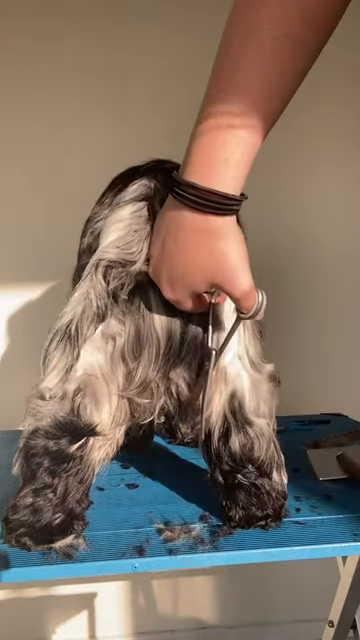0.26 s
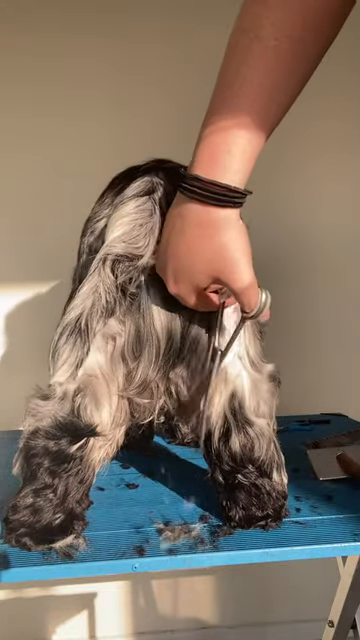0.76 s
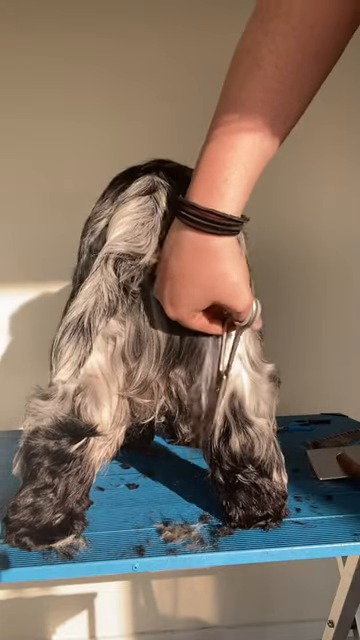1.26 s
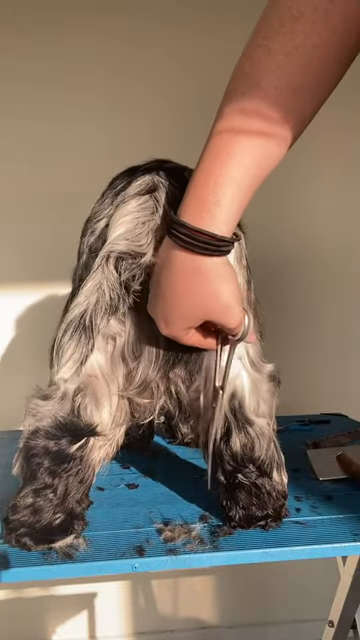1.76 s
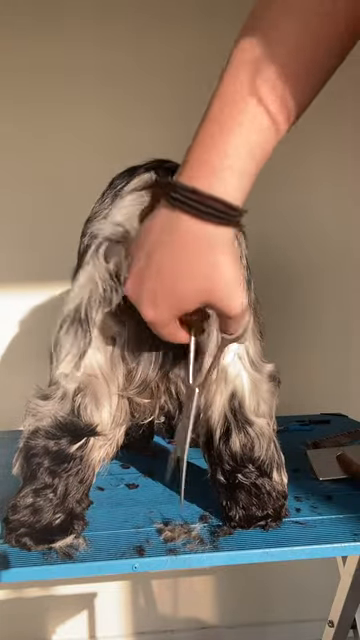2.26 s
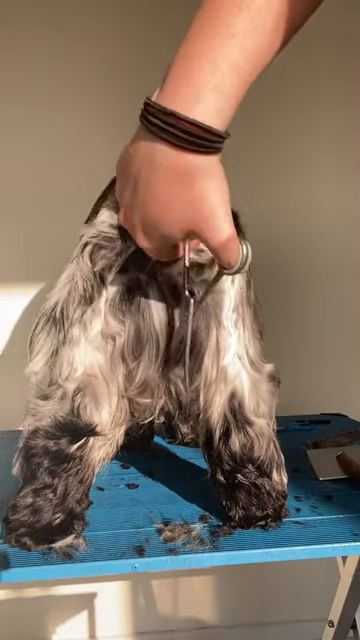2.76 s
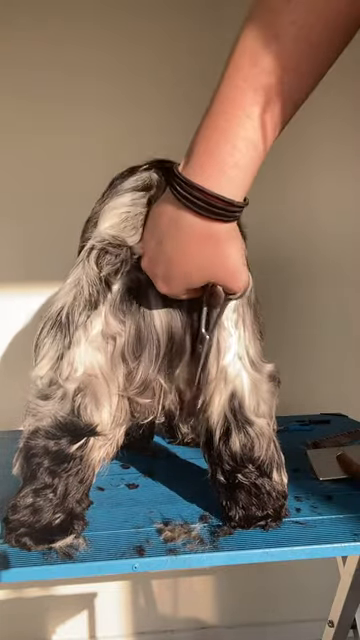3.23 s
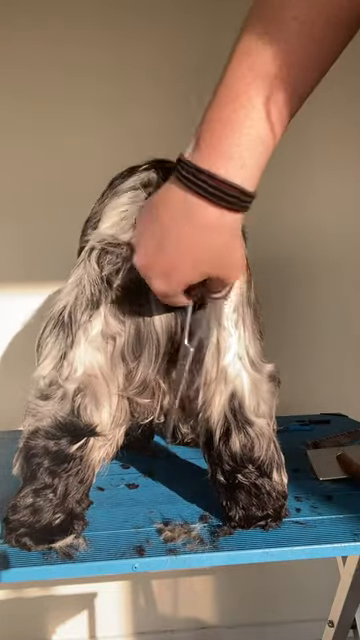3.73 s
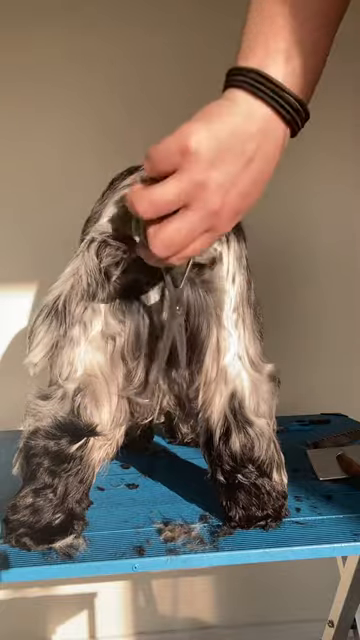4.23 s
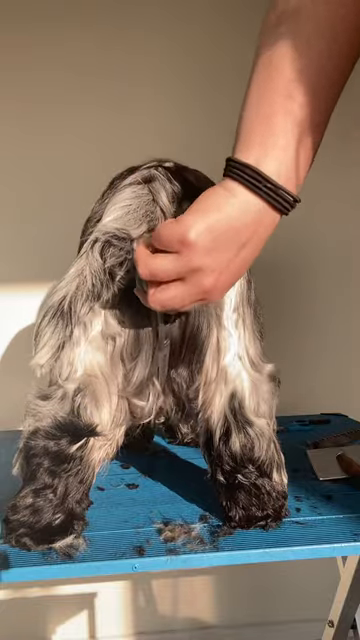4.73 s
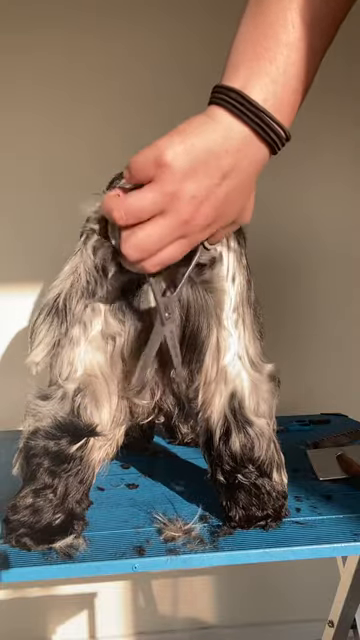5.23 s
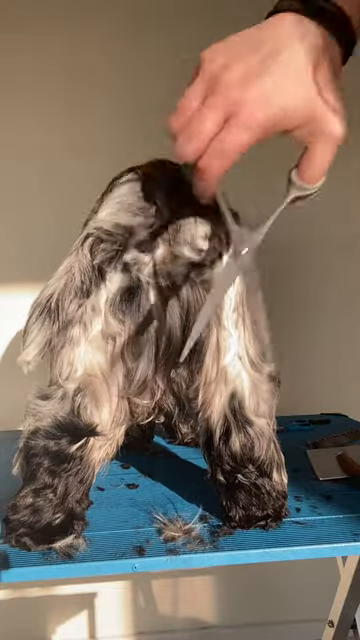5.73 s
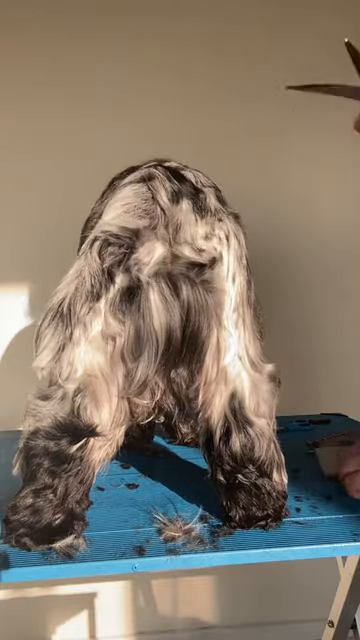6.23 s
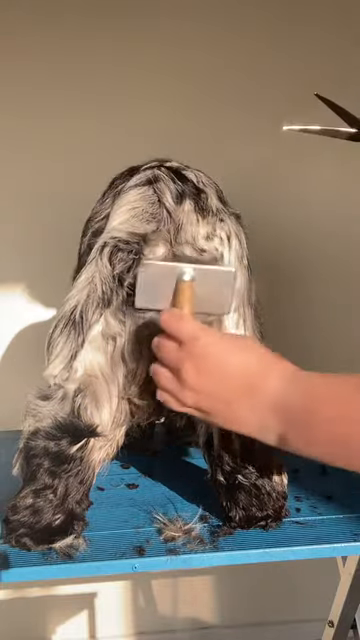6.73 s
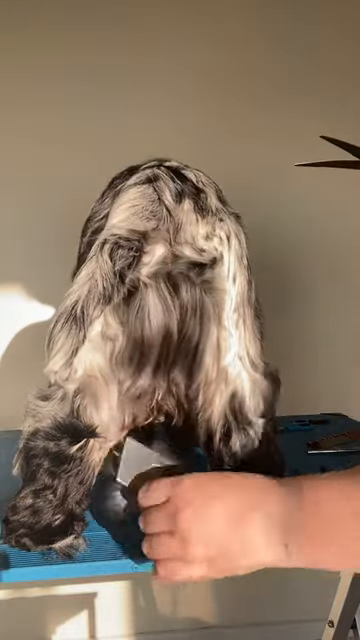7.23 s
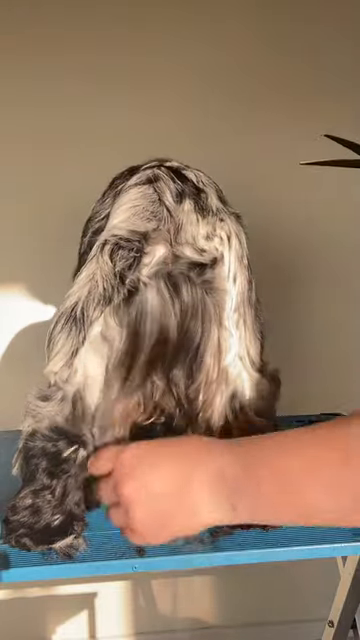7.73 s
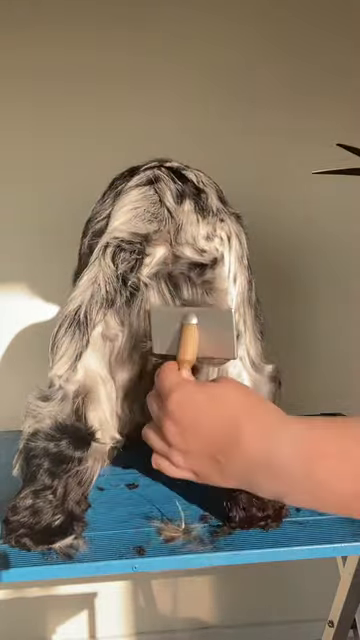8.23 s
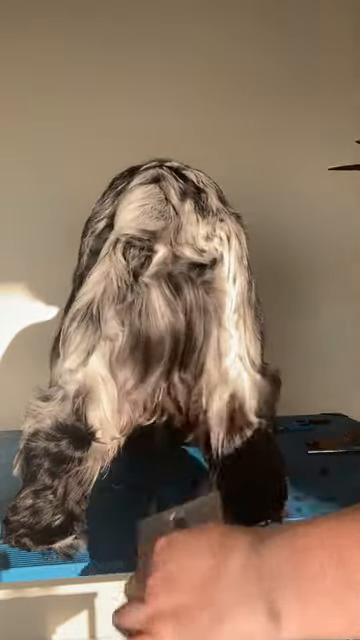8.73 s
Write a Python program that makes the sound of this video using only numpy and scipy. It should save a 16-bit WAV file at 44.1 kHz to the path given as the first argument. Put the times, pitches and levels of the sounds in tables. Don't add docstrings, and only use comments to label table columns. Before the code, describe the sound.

Grooming scissors snip thinly through dog hair in a quiet room, then a wire brush scrapes the coat and bangs hard on a table.

```python
import sys
import numpy as np
from scipy import signal
from scipy.fft import rfft, irfft
from scipy.io import wavfile

SR = 44100
rng = np.random.default_rng(int(sys.argv[2]) if len(sys.argv) > 2 else 0)


def boost(x):
    u = np.asarray(x, float) / 20
    return 10 ** u


def dump(signal):
    limited = np.clip(np.atleast_2d(signal).T, -1, 1)
    pcm = np.round(limited * 32767).astype(np.int16)
    wavfile.write(sys.argv[1], SR, pcm)


N = 396018

# start_s, peak_db, clatter_hz, crack_db, thump_db
FLAT_BLOWS = [
    (6.104, -37.5, 1300, -14, 6),
    (6.151, -18, 1180, -30.5, -1),
    (7.8098, -3, 1660, -11.5, -4.5),
    (8.667, -13.5, 2310, -7.5, -9),
]


def rms_one(x):
    return x / np.sqrt(np.mean(x ** 2) + 1e-20)


def in_time(tables, silent=-130):
    out = np.full((len(tables[0][0]) - 1, N), float(silent))
    for table in tables:
        s, *columns = np.transpose(table)
        s = np.r_[s[0] - .002, np.maximum.accumulate(s), s.max() + .015]
        i = np.arange(max(int(s[0] * SR), 0), min(int(s[-1] * SR), N))
        curves = [np.interp(i / SR, s, np.r_[silent, column, silent]) for column in columns]
        out[:, i] = np.maximum(out[:, i], curves)
    return out


def at_hz(points, hz):
    return np.interp(np.log(hz), np.log(np.array(points)[:, 0]), np.array(points)[:, 1])


def bin_hz(size):
    return np.maximum(np.arange(size // 2 + 1) * SR / size, 10)


def drift(rate):
    r = np.exp(-80 * np.pi * rate / SR)
    slow = signal.lfilter([1], [1, -2 * r, r * r], rng.standard_normal(N // 40 + 2002))[2000:]
    return np.interp(np.arange(N) / 40, np.arange(len(slow)), rms_one(slow))


def band(x, low_hz, high_hz):
    return signal.sosfilt(signal.butter(2, [low_hz, high_hz], "band", fs=SR, output="sos"), x)


def resonance(x, width_hz, hz):
    r = np.exp(-np.pi * width_hz / SR)
    zeros = np.array([1, 0, -1]) * (1 - r * r) / 2
    return signal.lfilter(zeros, [1, -2 * r * np.cos(2 * np.pi * hz / SR), r * r], x + 1e-18)


def ring(clicks, hz, t60):
    r, w = boost(-60 / (t60 * SR)), 2 * np.pi * hz / SR
    return signal.lfilter([0, np.sin(w)], [1, -2 * r * np.cos(w), r * r], clicks + 1e-18)


def grit(per_s, spread_db):
    sizes = boost(spread_db * np.minimum(rng.exponential(1, N), 4)) * rng.choice([-1, 1], N)
    return rms_one(sizes * (rng.random(N) < per_s / SR))


def stereo_noise(spectrum, likeness, size):
    hz = bin_hz(size)
    mid, side = rfft(rng.standard_normal((2, size)))
    alike = np.clip(at_hz(likeness, hz), -1, 1)
    pair = np.sqrt(1 + alike) * mid + np.sqrt(1 - alike) * side * [[1], [-1]]
    return hz, boost(at_hz(spectrum, hz)) * pair


def add(track, s, sound):
    i = round(s * SR)
    track[i:i + len(sound)] += sound[:N - i]


def swishes(rows, edge_db, width_share):
    out = np.zeros(N)
    for start_s, peak_s, end_s, db, hz in rows:
        t = start_s + np.arange(round((end_s - start_s) * SR)) / SR
        noise = rms_one(resonance(rng.standard_normal(SR), width_share * hz, hz))[:len(t)]
        level_db = np.interp(t, [start_s, peak_s, end_s], [db + edge_db, db, db + edge_db])
        add(out, start_s, boost(level_db) * noise)
    return out


def swells(rows, fade_s):
    return [(s - swell_s, s, s + fade_s, db, hz) for s, swell_s, db, hz in rows]


def hum():
    # freq_hz, density_db
    air_spectrum = [(15, -42), (28, -25.5), (59, 1), (112, -5.5), (142, 0), (172, -5.5), (243, -5),
                    (271, -13), (462, -10.5), (660, -15.5), (2600, -20), (3000, -26), (4150, -38),
                    (7680, -40.5), (12400, -52.5), (13000, -66.5)]
    # freq_hz, coherence
    air_likeness = [(60, 0.84), (130, 1), (290, -0.021), (640, -0.27), (1410, -0.19), (3100, -0.035),
                    (6820, 0.63), (15000, 0.0036)]
    # freq_hz, width_hz, level_db
    duct_modes = [(153, 64, -73.5), (233.8, 19, -66.5), (471.7, 16, -83), (2480, 64, -83.5)]
    air = irfft(stereo_noise(air_spectrum, air_likeness, N)[1], N)
    ducts = 0
    for hz, width_hz, db in duct_modes:
        tone = rms_one(resonance(rng.standard_normal(N), width_hz, hz))
        ducts = ducts + boost(db + 0.31 * drift(22)) * tone
    return boost(-64.5 + 0.84 * drift(0.8)) * rms_one(air) + ducts


def thuds():
    # peak_s, level_db
    thud_events = [(0.0, -54), (0.8, -56), (1.07, -58), (1.36, -56), (1.75, -66), (2.22, -56), (3.3, -56),
                   (3.93, -52), (4.279, -59), (4.56, -46), (5.18, -45.5), (5.86, -46), (7.13, -54),
                   (8.96, -50)]
    # lag_s from the peak, level_db
    thud_shape = [
        (-.1, -35),
        (0, -2),
        (.14, -13),
        (.3, -18),
    ]
    level_db, = in_time([[(s + lag_s, db + shape_db) for lag_s, shape_db in thud_shape]
                         for s, db in thud_events])
    pitch_hz = 48 * boost(1.4 * drift(5))
    level_db = np.maximum(level_db, -69.5 + 4.0 * drift(4))
    return boost(level_db - 4.5) * np.sin(2 * np.pi * np.cumsum(pitch_hz) / SR)


def room(x):
    # freq_hz, level_db
    colour = [(150, -1.5), (500, 6), (1500, -0.5), (4000, 2.5), (7000, -11), (11000, -9), (14300, -8.5),
              (15500, -28)]
    # freq_hz, coherence
    likeness = [(130, 1.0), (290, .95), (640, -.05), (4200, 0), (6000, .97), (7400, .97), (10000, 0),
                (12300, -1.05)]
    # freq_hz, t60_s
    decay = [(150, 0.41), (500, 0.54), (1500, 0.56), (4000, 0.48), (7000, 0.32), (12000, 0.27)]
    # freq_hz, level_db
    balance = [(150, -2.5), (500, 2.5), (1500, 2), (4000, 3), (8000, 1), (11000, -1)]
    size = 2 ** 15
    hz, noise = stereo_noise(colour, likeness, size)
    t, tail = np.arange(size) / SR, 0
    for centre_hz in 60 * 2 ** np.arange(0, 8.5, .5):
        window = np.cos(np.pi * np.clip(np.log2(hz / centre_hz), -.5, .5)) ** 2
        part = irfft(noise * window, size) * boost(-60 * t / at_hz(decay, centre_hz))
        energy = np.sum(part ** 2, axis=1, keepdims=True) + 1e-20
        sides = boost(at_hz(balance, centre_hz) / 2 * np.array([[1], [-1]]))
        tail = tail + part * np.sqrt(energy.mean() / energy) * sides
    tail = tail * (1 - np.exp(-(t / 0.0018) ** 2))
    return signal.fftconvolve(x[None], tail / np.sqrt(np.sum(tail ** 2) / 2), axes=1)[:, :N]


def at_ports(x, pan_db):
    # freq_hz, phase_rad
    port_phase = [(300, 0), (2000, -.6), (4000, .2), (6500, -.3), (8000, -.9), (10000, -1.7),
                  (12000, -2.45), (13600, -3.14)]
    turn = np.exp(.5j * at_hz(port_phase, bin_hz(N)))
    left, right = turn * boost(pan_db / 2 * turn.real), boost(-pan_db / 2 * turn.real) / turn
    return irfft(rfft(x) * np.array([left, right]), N)


def shifting_dog():
    # start_s, peak_s, end_s, level_db, centre_hz
    shifts = [
        (2.15, 2.32, 2.5, -71, 434),
        (3.55, 3.93, 4.4, -75, 526),
        (3.58, 3.62, 4.4, -74, 1104),
    ]
    return swishes(shifts, edge_db=-17, width_share=0.12)


def table_boom():
    # start_s, level_db
    pushes = [(6.105, -49), (6.153, -40.5), (6.24, -44), (7.066, -28.5), (7.809, -20), (8.206, -72),
              (8.667, -27.5)]
    # freq_hz, level_db, t60_s
    frame_modes = [(65, -24.5, 0.52), (105, -15.5, 0.33), (190, -10.5, 0.4)]
    boom_hz, boom_t60_s, swell_s = 142.2, 0.5, 0.067
    push, out = np.zeros(N), 0
    for s, db in pushes:
        add(push, s, boost(db + 3.5) * np.ones(1))
    for hz, db, t60 in [(boom_hz, 0, boom_t60_s)] + frame_modes:
        swell_t60 = 1 / (1 / t60 + 1 / swell_s / np.log(1000))
        out = out + boost(db) * (ring(push, hz, t60) - ring(push, hz, swell_t60))
    return out


def table_top():
    # freq_hz, level_db, t60_s
    top_modes = [(281, -7, 0.4), (390, -9.5, 0.68), (526, -3.5, 0.38), (750, -16.5, 0.35),
                 (828, -11.5, 0.2), (970, -5, 0.4), (1240, -2, 0.27), (1490, -2, 0.27), (1678, -2.5, 0.3),
                 (1970, -4, 0.31), (2020, -6, 0.25), (2130, -13.5, 0.54), (2295, -10, 0.3),
                 (2440, -7, 0.65)]
    longest_s = .36
    out, click = np.zeros(N), band(1. * (np.arange(20000) == 0), 220, 5000)
    strengths_db = rng.normal(0, 3, (len(FLAT_BLOWS), len(top_modes)))
    for (s, db, *rest), strength_db in zip(FLAT_BLOWS, strengths_db):
        for (hz, mode_db, t60), own_db in zip(top_modes, strength_db):
            add(out, s, boost(db - 24 + mode_db + own_db) * ring(click, hz, min(t60, longest_s)))
    return out


def brush_body():
    # start_s, freq_hz, level_db, t60_s
    body_rings = [(6.151, 1564, -30, 0.088), (6.151, 974, -42, 0.1), (6.151, 491, -36, 0.21),
                  (6.151, 400, -45, .15), (7.8105, 387, -30.5, .21), (7.8098, 861, -24, 0.066),
                  (7.81, 1460, -25.5, .089), (7.8111, 2200, -23.5, .08), (7.8094, 2540, -28, .2),
                  (7.8104, 2980, -30.5, .18), (8.667, 1970, -27, 0.071), (8.667, 541, -53, 0.17),
                  (8.667, 2670, -36, 0.15)]
    # start_s, peak_s, end_s, level_db, centre_hz
    rustles = [(2.24, 2.27, 2.41, -79, 3800), (5.91, 6.236, 6.25, -64, 5500),
               (6.222, 6.236, 6.25, -61, 8400), (6.17, 6.185, 6.2, -59, 8500)]
    out, click = swishes(rustles, -5, width_share=0.23), 1. * (np.arange(9000) == 0)
    for s, hz, db, t60 in body_rings:
        add(out, s, boost(db) * ring(click, hz, t60))
    return out


def wire_song():
    # start_s, peak_s, end_s, level_db, pitch_hz
    songs = [(6.66, 6.74, 6.95, -80, 4680), (6.7, 6.81, 6.86, -83, 6600), (8.34, 8.37, 8.45, -80, 4850),
             (8.53, 8.56, 8.575, -81, 5700), (7.79, 7.805, 7.81, -53, 2500), (7.79, 7.805, 7.81, -60, 1200),
             (7.79, 7.805, 7.81, -62.5, 4600), (8.655, 8.662, 8.667, -63, 2620),
             (6.29, 6.34, 6.5, -80, 5100)]
    return swishes(songs, edge_db=-5, width_share=0.049)


def bristles():
    # start_s, end_s, start_db, end_db, brightness_db
    sweeps = [(5.884, 6.046, -83, -86, 18.5), (6.056, 6.1, -73, -55, 8), (6.113, 6.168, -46, -37, 5.5),
              (6.168, 6.3, -53, -76, -13), (6.647, 6.852, -73, -61, -21), (6.864, 7.032, -56, -67.5, -7),
              (7.71, 7.807, -80, -42, -4.5), (8.337, 8.554, -55, -76, -12), (8.632, 8.663, -85.5, -52, -14)]
    # freq_hz, density_db
    scratch_spectrum = [(500, -10), (1000, 11), (2000, 5.5), (3500, -1), (5000, -2.5), (5700, -0.5),
                        (6600, -9.5), (8000, -10), (11000, -11), (14000, -16.5)]
    level_db, bright_db = in_time([[(start_s, start_db, bright), (end_s, end_db, bright)]
                                   for start_s, end_s, start_db, end_db, bright in sweeps])
    grains = rfft(grit(per_s=15000, spread_db=3.0))
    scratch = rms_one(irfft(grains * boost(at_hz(scratch_spectrum, bin_hz(N))), N))
    high = signal.sosfilt(signal.butter(2, 3000, "high", fs=SR, output="sos"), scratch)
    return boost(level_db - 11.5 + 2.7 * drift(20)) * (scratch - high + boost(bright_db) * high)


def taps():
    # start_s, peak_db, handle_hz, crack_db, room_db
    light_taps = [(6.057, -35.5, 1200, -14, 2.5), (6.152, -37, 457, -51, -37),
                  (6.361, -38.5, 1480, -24, -4.5), (6.863, -39, 2740, -21, -16),
                  (7.128, -43, 1480, -37, -15), (6.236, -41.5, 1521, -20, 6),
                  (6.2975, -33.5, 1220, -7, -1.5), (6.104, -41, 3460, -5, 3.5), (6.355, -37, 1040, -38, -1),
                  (6.667, -57, 840, -34, 12.5), (6.862, -36.5, 940, -42, -2), (7.067, -33, 910, -13.5, 4),
                  (7.117, -37, 1876, -5, -30), (7.265, -53, 750, -31, 2), (7.495, -47.5, 1700, -40, -12),
                  (7.658, -49.5, 994, -44.5, 2.5), (8.151, -44.5, 880, -30, -2),
                  (8.204, -46.5, 890, -29, 1), (8.235, -42.5, 967, -35, -4), (8.245, -34, 2440, -14, -15),
                  (8.252, -45, 2840, -22, -22), (8.3425, -49, 4500, -7, -13), (8.289, -37, 1010, -30.5, -6),
                  (8.296, -31.5, 970, -18, -8), (8.3327, -34.5, 3700, -16, -16.5),
                  (8.268, -46, 2800, -20, -2), (8.321, -51, 2000, -11, -15), (8.354, -50, 2913, -18, -15),
                  (8.42, -49.5, 949, -31.5, 1.5), (8.437, -52.5, 900, -32, 0), (8.559, -55, 798, -22, 7)]
    # start_s, peak_db, handle_hz, crack_db, room_db
    grazes = [(7.0, -57.5, 3850, -21, -13), (7.009, -61, 5800, -19, -12), (7.06, -42.5, 1900, 1, 3),
              (7.776, -53.5, 1190, -15, -12), (7.787, -42, 1400, -4.5, -12), (7.757, -55, 3490, -6.5, -6.5),
              (7.7993, -41.5, 2406, -8.5, 4), (8.656, -48, 2500, -35, 0)]
    # multiple of handle_hz, level_db
    handle_modes = [(1.003, -3), (2.048, -8.5), (3.05, -19.5), (5.1, -22.5)]
    near, feed, t = np.zeros(N), np.zeros(N), np.arange(2500) / SR
    hits, click = sorted(light_taps + grazes), 1. * (t == 0)
    touch = np.hanning(9) / 4
    touch = np.pad(touch, (0, len(t) - len(touch)))
    rattles = rng.standard_normal((len(hits), len(t)))
    strengths_db = rng.normal(0, 1.5, (len(hits), len(handle_modes)))
    for (s, db, hz, crack_db, room_db), rattle, strength_db in zip(hits, rattles, strengths_db):
        crack = band(band(rattle * (t / .0003) * np.exp(-t / 0.00027), 3200, 8200), 2000, 10500)
        knock = band(rattle * (t * hz) * np.exp(-t * hz / 0.97), 0.72 * hz, 1.4 * hz)
        sound = boost(crack_db - 2.0) * crack / np.max(np.abs(crack))
        sound = sound + boost(-5.5) * knock / np.max(np.abs(knock))
        for (multiple, mode_db), own_db in zip(handle_modes, strength_db):
            mode = ring(touch, min(multiple * hz, 9000), 16 / hz / np.sqrt(multiple))
            sound = sound + boost(mode_db + own_db + 3) * mode
        add(near, s, boost(db) * band(sound, 0.65 * hz, 14000))
        into_room = boost(crack_db + 18.0) * band(click, 3000, 9000) + boost(20.5) * band(click, 180, 1.88 * hz)
        add(feed, s, boost(db + room_db) * into_room)
    return near, feed


def slams():
    near, feed, t = np.zeros(N), np.zeros(N), np.arange(9000) / SR
    rattles, click = rng.standard_normal((len(FLAT_BLOWS), len(t))), 1. * (t == 0)
    for (s, db, hz, crack_db, thump_db), rattle in zip(FLAT_BLOWS, rattles):
        rise = rattle * (t / 0.0008)
        crack = band(band(rise * np.exp(-t / 0.00076), 2200, 8500), 1100, 11500)
        crack = crack + boost(-16) * band(rise * np.exp(-t / 0.0011), 10000, 11000)
        clatter = band(rattle, 650, 1.43 * hz) + boost(crack_db + 5.5) * band(rattle, 1400, 2500)
        clatter = clatter * (1 - np.exp(-t / 0.00093)) * np.exp(-t / 0.042)
        clatter = band(band(clatter, 300, 8700), 200, 9700)
        blow = boost(crack_db + 11.0) * crack / np.max(np.abs(crack)) + boost(-4.5) * clatter
        add(near, s, boost(db) * blow)
        into_room = boost(crack_db + 31.0) * band(click, 3800, 9700)
        into_room = into_room + boost(crack_db + 27.5) * band(click, 1400, 2200)
        into_room = into_room + boost(23.5) * band(click, 620, 1.255 * hz)
        into_room = into_room + boost(thump_db + 23.0) * band(click, 140, 825)
        add(feed, s, boost(db) * into_room)
    return near, feed


def dust():
    # peak_s, swell_s, level_db, centre_hz
    hisses = [(.39, .04, -72, 15200), (.845, .01, -72, 14800), (.895, .01, -68, 15000),
              (1.225, .015, -66, 15200), (1.65, .025, -60, 15000), (1.848, .01, -67, 14800),
              (3.268, .01, -64, 15000), (3.472, .01, -68, 14800), (3.8, .01, -61, 14200),
              (4.825, .03, -56, 14800), (5.012, .012, -56, 14800), (6.225, .018, -66, 14500)]
    return band(swishes(swells(hisses, fade_s=.02), edge_db=-5, width_share=.15), 10800, 18000)


def squeaks():
    # start_s, length_s, from_hz, to_hz, level_db
    glides = [(0.608, 0.019, 7000, 6360, -58), (0.87, 0.018, 4610, 8730, -61),
              (1.635, 0.026, 3950, 8640, -64.5), (2.03, 0.018, 3580, 9100, -69),
              (3.594, 0.026, 3800, 8800, -68.5)]
    out, chatter = np.zeros(N), boost(7.6 * drift(74))
    for s, length_s, from_hz, to_hz, db in glides:
        u = np.arange(round(length_s * SR)) / (length_s * SR)
        phase = 2 * np.pi * np.cumsum(from_hz + (to_hz - from_hz) * u) / SR
        add(out, s, boost(db) * np.sin(np.pi * u) ** .5 * np.sin(phase))
    return out * chatter


def bowed():
    # peak_s, swell_s, level_db, pitch_hz
    bowed_modes = [(.412, .04, -68, 4730), (.41, .02, -68, 1950), (.43, .035, -66, 10500),
                   (.645, .015, -70, 10900), (.62, .012, -68, 6700), (.868, .035, -66, 4660),
                   (.86, .015, -70, 11500), (1.053, .013, -70, 6900), (1.082, .017, -72, 10700),
                   (1.205, .025, -75, 5530), (1.235, .025, -68, 4770), (1.245, .02, -69, 7000),
                   (1.445, .02, -69, 10800), (1.428, .025, -69, 4870), (1.425, .015, -70, 6800),
                   (1.64, .035, -68, 4470), (1.655, .012, -66, 4600), (1.635, .035, -72, 12000),
                   (1.822, .008, -68, 4600), (1.848, .013, -69, 4100), (1.86, .02, -70, 10600),
                   (1.84, .015, -71, 5500), (2.02, .035, -75, 5500), (2.04, .05, -68, 10800),
                   (2.03, .015, -73, 7000), (2.222, .012, -67, 10700), (2.237, .02, -69, 4000),
                   (2.222, .012, -70, 8100), (3.25, .06, -70, 4690), (3.25, .06, -68, 12200),
                   (3.235, .035, -76, 7000), (3.47, .03, -71, 5500), (3.465, .025, -70, 12000),
                   (3.585, .025, -74, 5600), (3.597, .03, -67, 11900), (3.768, .013, -67, 5900),
                   (3.792, .022, -68, 10600), (3.79, .015, -68, 5500), (3.79, .01, -70, 7700),
                   (4.803, .023, -66, 11800), (4.8, .015, -72, 7040), (4.829, .015, -65, 5200),
                   (5.01, .015, -66, 6900), (5.015, .015, -64, 11800), (5.012, .015, -68, 4900),
                   (5.03, .012, -68, 6600)]
    return swishes(swells(bowed_modes, fade_s=.012), edge_db=-8, width_share=0.024)


def releases():
    # start_s, peak_db, lowest_hz
    tick_events = [(0.4395, -38.5, 1800), (0.44, -36, 12000), (1.401, -56, 12000), (2.054, -41, 12000),
                   (0.596, -52, 1500), (1.029, -58, 5800), (1.261, -41.5, 1760), (1.807, -57, 5000),
                   (2.053, -44, 1800), (2.198, -60, 1800), (2.207, -50, 9000), (3.268, -44, 1800),
                   (3.279, -39, 9000), (3.422, -56, 6000), (3.758, -54, 9500), (4.833, -34.5, 1800),
                   (4.993, -45, 8000), (7.8096, -26, 12000), (8.667, -31, 11000)]
    out, t = np.zeros(N), np.arange(200) / SR
    for (s, db, low_hz), tick in zip(tick_events, rng.standard_normal((len(tick_events), len(t)))):
        add(out, s, boost(db - 2.0) * band(tick * np.exp(-t / 0.00059), low_hz, 16000))
    return out


def tip_clicks():
    # start_s, peak_db, ring_hz
    click_events = [(0.44, -23.5, 10400), (0.8826, -38, 4580), (1.038, -68, 6940), (1.2456, -31, 10400),
                    (1.234, -36, 10400), (1.258, -40, 8870), (1.4011, -58, 4730), (1.658, -37, 8600),
                    (1.819, -50, 4500), (2.0513, -33.5, 11140), (2.2088, -43, 10800), (3.268, -35, 4840),
                    (3.2784, -69, 4700), (3.431, -59, 4800), (3.6176, -33.5, 8870), (3.758, -35, 12300),
                    (3.775, -31, 11500), (4.81, -38, 10400), (4.8285, -35, 9700), (4.9915, -55, 10700)]
    out, t = np.zeros(N), np.arange(1200) / SR
    ticks = rng.standard_normal((len(click_events), len(t)))
    for (s, db, hz), tick in zip(click_events, ticks):
        burst = np.diff(tick * (t / .0005) * np.exp(-t / 0.00031), prepend=0)
        struck = np.sin(2 * np.pi * hz * t) * (1 - np.exp(-t / .0006)) * np.exp(-t / .0011)
        add(out, s, boost(db) * (boost(-33) * burst / np.max(np.abs(burst)) + boost(2.0) * struck))
    return out


def strokes():
    # tips_s, level_db, edge_over_bending_db, middle_hz, edge_hz
    closings = [(0.44, -56, 5, 8100, 11200), (0.888, -57.5, 2.5, 8900, 9900),
                (1.655, -60.5, 1, 9100, 10400), (3.266, -59.5, 1, 7300, 12200),
                (3.618, -58, 3.5, 8890, 11600)]
    # tips_s, level_db, edge_over_bending_db, middle_hz, edge_hz
    quick_closings = [(1.252, -53.5, 3.6, 7000, 10400), (2.054, -59, 5.7, 8400, 11400),
                      (4.832, -52, 2.4, 8440, 10600)]
    # tips_s, level_db, edge_over_bending_db, middle_hz, edge_hz
    openings = [(0.603, -63.5, 0.14, 6500, 10900), (1.036, -64.5, -0.16, 6900, 11200),
                (1.4, -64.5, 1, 6900, 11800), (1.814, -63, 0, 7300, 11400),
                (2.206, -59.5, 1.7, 8100, 10600), (3.428, -63.5, -1.3, 7500, 12200),
                (3.754, -60, 1.3, 6900, 10400), (4.989, -60.5, 0.7, 6940, 11200)]
    # lag_s from the tips, bending_db, middle_db, edge_db
    closing_shape = [
        (-.085, -49, -63, -51),
        (-.04, -10, -21, -17),
        (-.012, -5.5, -18.5, 1.5),
        (0, 4, 3.5, 1.5),
        (0.012, -20, -9, -29),
    ]
    # lag_s from the tips, bending_db, middle_db, edge_db
    opening_shape = [
        (0, -4.5, -9.5, -12),
        (.009, -4.5, -2.5, 3),
        (.035, -2.5, -6.5, 2.2),
        (0.065, -17, -15, -14),
    ]
    kinds = [(closings, closing_shape, 1), (quick_closings, closing_shape, 0.66), (openings, opening_shape, 1)]
    tables = []
    for rows, shape, share in kinds:
        for s, db, tilt_db, middle_hz, edge_hz in rows:
            tables.append([(s + lag_s * share, db - tilt_db + low_db, db + middle_db, db + tilt_db + edge_db,
                            middle_hz, edge_hz) for lag_s, low_db, middle_db, edge_db in shape])
    return in_time(tables)


def blades():
    # freq_hz, width_hz, level_db
    low_modes = [(2080, 220, -8), (3540, 2300, -10), (4700, 420, -5), (5800, 290, -20)]
    # freq_hz, width_hz, level_db
    middle_modes = [(6140, 410, -47), (6900, 540, -0.5), (7830, 70, -5.5), (8100, 470, -3), (8870, 220, -1)]
    # freq_hz, width_hz, level_db
    edge_modes = [(9640, 670, -3.5), (10400, 290, -2.5), (11200, 1000, 0.5), (12200, 320, 3)]
    low_db, middle_db, edge_db, middle_hz, edge_hz = strokes()
    rub = grit(per_s=6000, spread_db=1.0)
    out = band(rub * boost(middle_db - 4.0), 2940, 9500)
    out = out + band(rub * boost(low_db - 1.0), 4400, 6000)
    out = out + band(rub * boost(edge_db + 12), 13500, 16500)
    families = [(low_db, low_modes, None), (middle_db, middle_modes, middle_hz), (edge_db, edge_modes, edge_hz)]
    for level_db, modes, peak_hz in families:
        for k, (hz, width_hz, db) in enumerate(modes):
            off_db = 0
            if peak_hz is not None:
                off_db = -9 * np.minimum(np.abs(hz - peak_hz) / hz / 0.1, 1)
            drive = rub * boost(level_db + db + off_db + 5.5 * drift(45))
            gain = np.sqrt(SR / np.pi / width_hz) * boost(-0.5)
            out += (-1) ** k * resonance(drive, width_hz, hz) * gain
    return out


def scene():
    edges, ticks = blades(), releases()
    scissors, singing = edges + ticks, tip_clicks() + squeaks()
    brush = bristles() + wire_song() + shifting_dog()
    near, feed = np.add(slams(), taps())
    top, bowing, hiss = table_top() + brush_body(), bowed(), dust()
    dull = signal.sosfilt(signal.cheby2(8, 50, 15300, fs=SR, output="sos"), feed)
    direct = at_ports(scissors + singing + bowing + hiss, pan_db=2.5)
    direct = direct + boost(-10) * hiss + boost(-3.5) * band(ticks, 12500, 16500)
    direct = direct + at_ports(near + brush + top, pan_db=0.4)
    direct = direct + table_boom() * boost([[.3], [-.3]])
    sent = boost(-8.0) * scissors + boost(-7) * singing + boost(-17) * bowing + boost(-5.5) * brush + boost(-0.5) * dull
    return direct + room(sent) + hum() + thuds()


def top_cut(x):
    return signal.sosfilt(signal.butter(12, 16680, fs=SR, output="sos"), x)


def record(dry):
    dry = signal.sosfilt(signal.cheby2(10, 60, 16900, fs=SR, output="sos"), dry)
    mix = signal.sosfilt(signal.butter(2, 17000, fs=SR, output="sos"), dry)
    return top_cut(mix)


dry = scene()
out = record(dry)
dump(out)
```